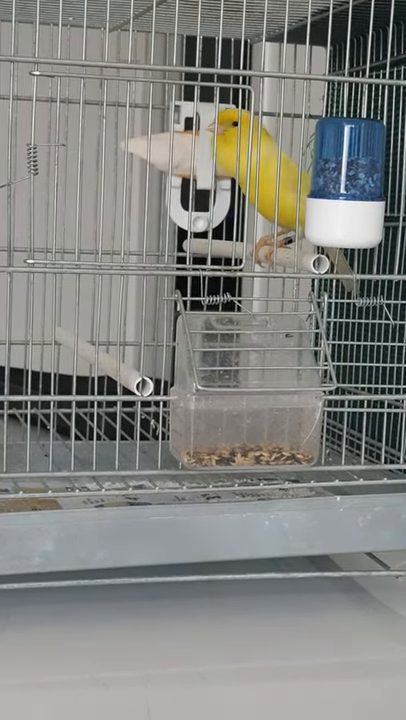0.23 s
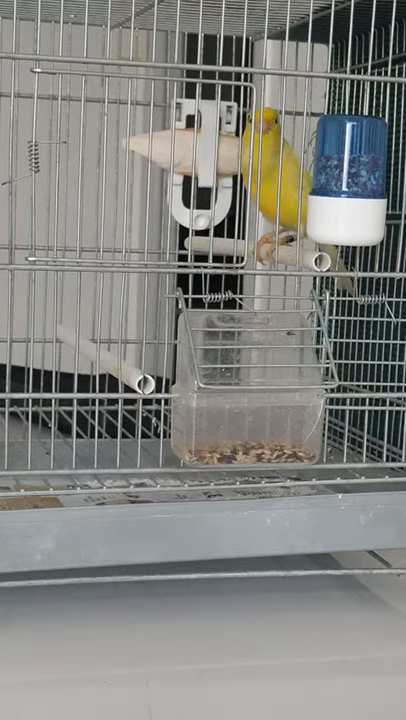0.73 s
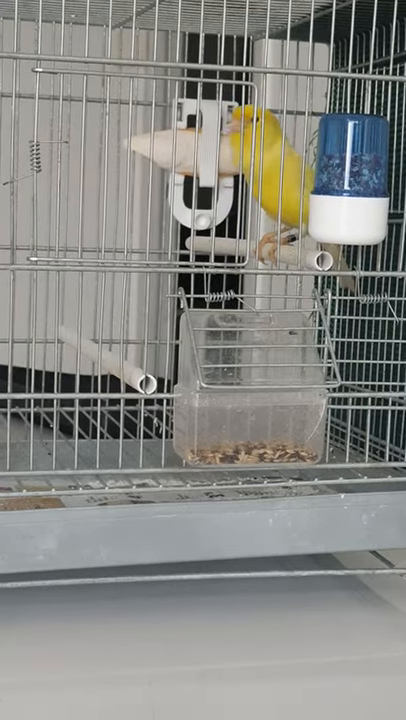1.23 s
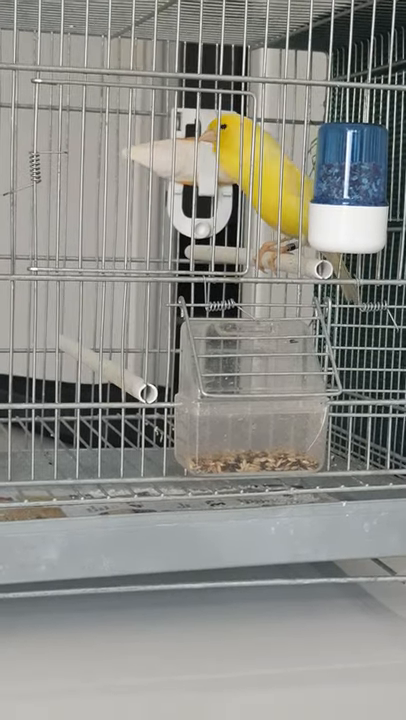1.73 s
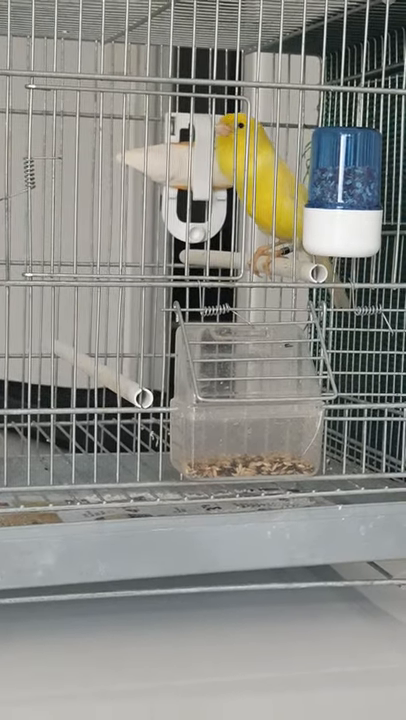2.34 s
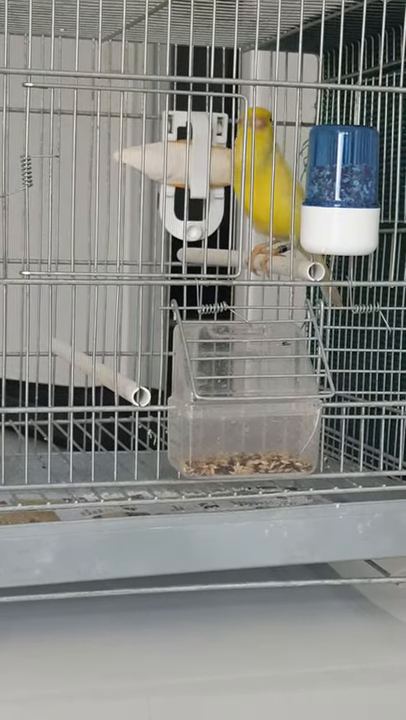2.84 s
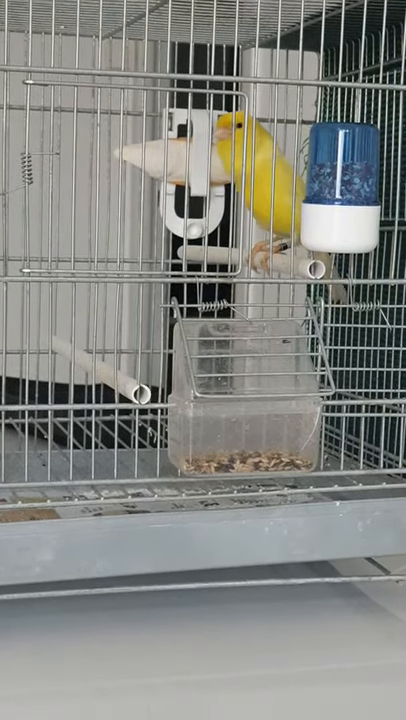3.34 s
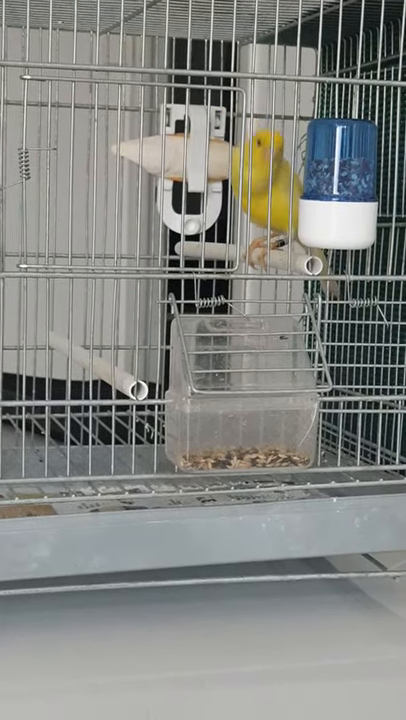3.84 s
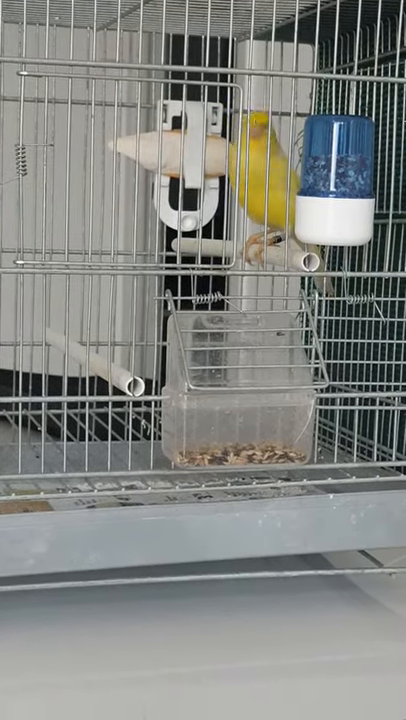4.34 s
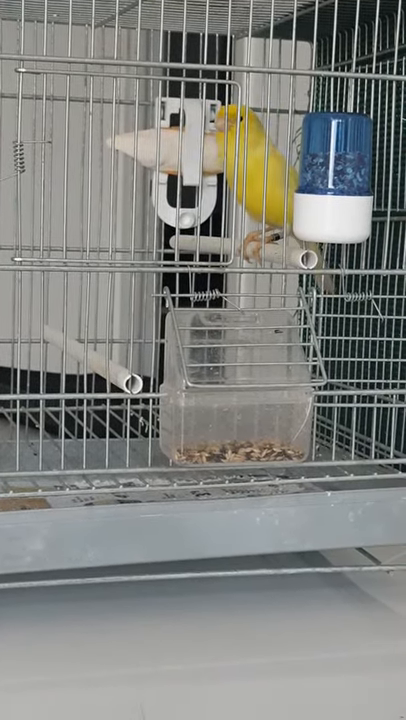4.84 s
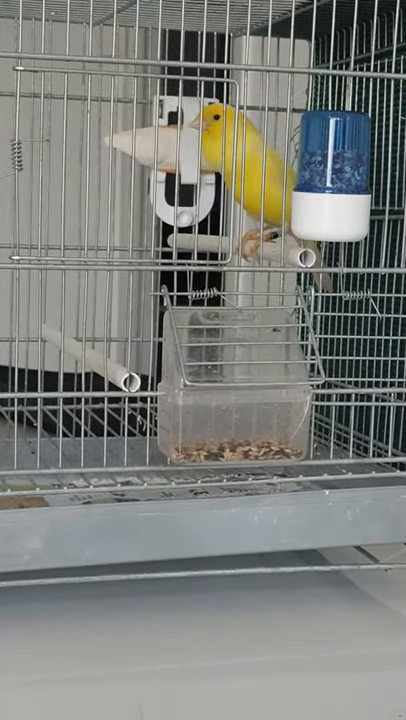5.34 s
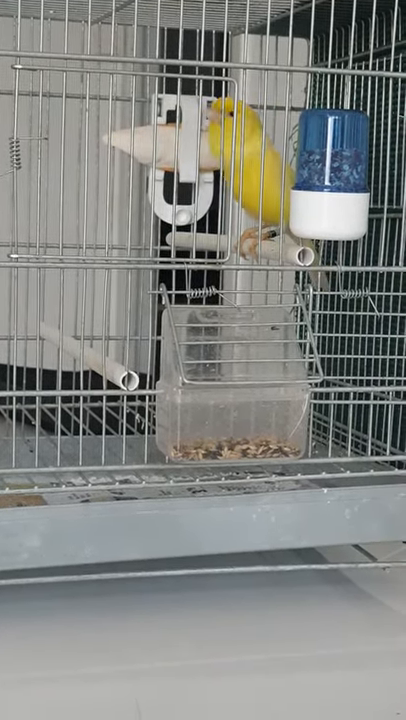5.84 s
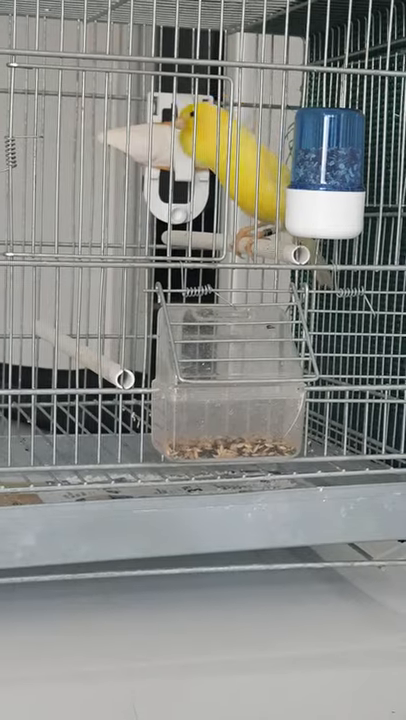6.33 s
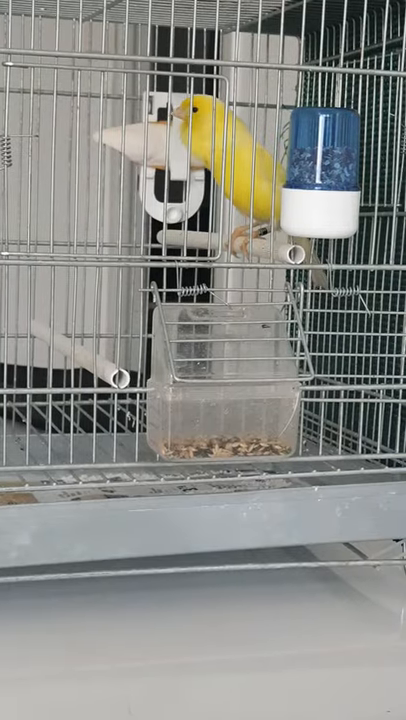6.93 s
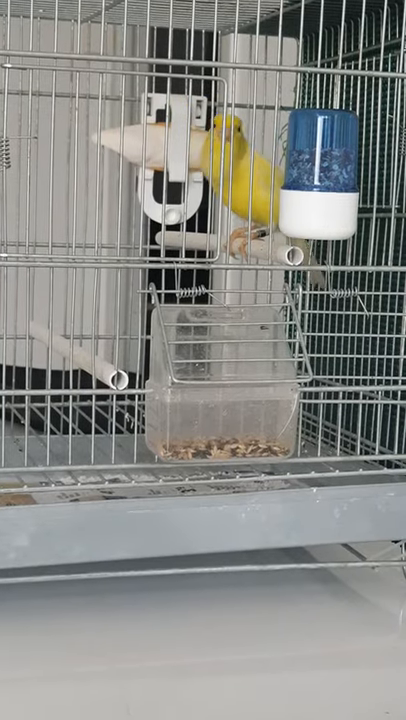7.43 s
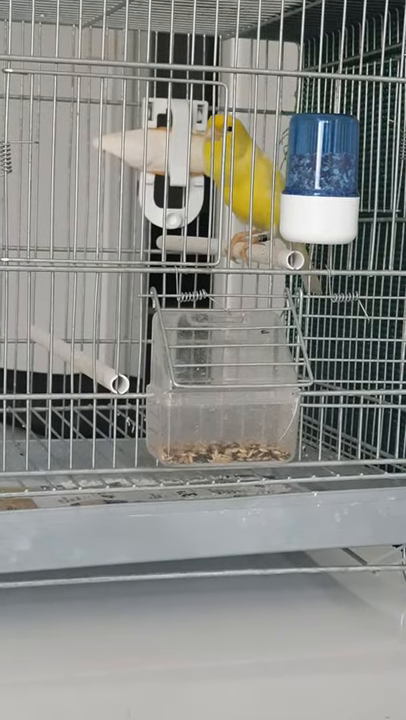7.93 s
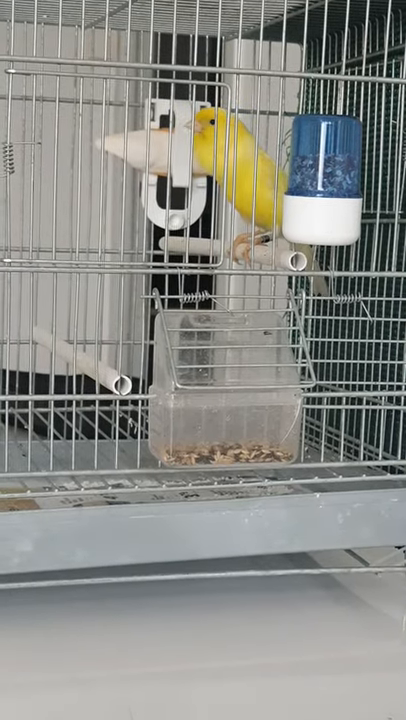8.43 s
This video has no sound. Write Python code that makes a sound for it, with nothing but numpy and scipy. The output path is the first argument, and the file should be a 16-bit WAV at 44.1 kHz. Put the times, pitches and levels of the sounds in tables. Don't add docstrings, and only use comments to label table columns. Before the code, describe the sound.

A caged canary sings in a bare echoing room: sharp chips, falling whistles, a hard quickening-loud roll, bubbling notes, then a fluted trill.

```python
import sys
import numpy as np
from scipy import signal
from scipy.fft import rfft, irfft
from scipy.io import wavfile
from scipy.ndimage import uniform_filter1d

SR = 44100
rng = np.random.default_rng(int(sys.argv[2]) if len(sys.argv) > 2 else 0)


def to_linear_factor(level_db):
    exponent = np.asarray(level_db, float) / 20
    return 10 ** exponent


def inscribe(sig):
    pcm = np.round(np.clip(np.atleast_2d(sig).T, -1, 1) * 32767)
    wavfile.write(sys.argv[1], SR, pcm.astype(np.int16))


N = 382788


def at_hz(points, hz):
    table_hz, value = np.transpose(points)
    return np.interp(np.log(hz + 1), np.log(table_hz), value)


def wander(hz):
    warm_up = 4410
    lowpass = signal.butter(2, hz, fs=SR, output="sos")
    slow = signal.sosfilt(lowpass, rng.standard_normal(N + warm_up))[warm_up:]
    return slow / slow.std()


# (frequency [Hz], level [dB])
THROAT = [(1200, 14.5), (2600, 7.5), (3300, -11), (4300, 3), (5600, -5.5), (6800, 3), (8200, -2),
          (10200, -1), (13500, -1.5), (15500, 5)]


def sing(syllables, shape, tone, air, own_pitch=False, purer=.18):
    out = np.zeros(N)
    when, ratio, shape_db = np.transpose(shape)
    flutter, breath = air
    for s, level_db, hz, length in syllables:
        knots = s + when * length
        first, last = max(round(knots[0] * SR), 0), min(round(knots[-1] * SR), N)
        i = np.arange(first, last)
        base_hz = 1 if own_pitch else hz
        pitch = np.interp(i / SR, knots, ratio) * base_hz * flutter[i]
        phase = 2 * np.pi * (np.cumsum(pitch) / SR + rng.random())
        push_db = np.interp(i / SR, knots, shape_db)
        wave = to_linear_factor(tone[0][1]) * np.sin(phase)
        for k, db in tone[1:]:
            colour = to_linear_factor(db + purer * push_db + at_hz(THROAT, k * pitch))
            colour *= k * pitch < SR / 2.2
            gusts = breath[(i + round(k * 9000)) % N]
            wave += colour * gusts * np.sin(k * phase)
        swell = to_linear_factor(level_db + push_db) * signal.windows.tukey(len(i), 90 / len(i))
        out[i] += uniform_filter1d(swell, size=45, mode="constant") * wave
    return out


def tour(marks, effort):
    s, level_db, hz = np.transpose(effort)
    spread_db, spread_pitch = .8, .007
    chance = rng.standard_normal((len(marks), 2)) * [spread_db, spread_pitch]
    rows = []
    for mark, (db, share) in zip(marks, chance):
        pitch = np.interp(mark, s, hz) * (1 + share)
        rows.append((mark, np.interp(mark, s, level_db) + db, pitch, 1))
    return rows


def low_side(notes, level_db, follows):
    mean_db = np.mean([row[1] for row in notes])
    return [(s, level_db + follows * (db - mean_db), hz, length) for s, db, hz, length in notes]


# (frequency
# [Hz], density [dB per Hz])
BACKGROUND_AIR = [(25, -48.5), (40, -12.5), (55, -2.5), (100, -9), (160, -18.5), (400, -23), (900, -28),
                  (1600, -7.5), (2050, -26.5), (2800, -20.5), (4500, -37), (8500, -40), (12000, -33), (15800, -37.5)]
# (frequency [Hz], likeness [0-1])
LIKENESS = [(30, .78), (70, .58), (150, .2), (600, .1), (3000, .1), (12000, .1)]
# (frequency [Hz], level [dB])
MAINS = (50.3, -77)


def background_air():
    t, hz = np.arange(N) / SR, np.fft.rfftfreq(N, 1 / SR)
    alike = np.clip(at_hz(LIKENESS, hz), 0, 1)
    mid, side = rfft(rng.standard_normal((2, N)))
    pair = np.sqrt(1 + alike) * mid + np.sqrt(1 - alike) * side * [[1], [-1]]
    air = irfft(to_linear_factor(at_hz(BACKGROUND_AIR, hz)) * pair, N)
    level_db, left_right_db = -66, 1
    mains_hz, mains_db = MAINS
    hum = to_linear_factor(mains_db + 3 * wander(3.6)) * np.sin(2 * np.pi * mains_hz * t)
    return to_linear_factor(level_db + left_right_db * np.array([[.5], [-.5]])) * air / air.std() + hum


# (time [s], peak level [dB], pitch [Hz], length factor)
OPENING = [
    (0.00086, -34, 1854, 0.84),
]
# (time from mark [s], pitch ratio, level [dB])
OPENING_NOTE = [(0, .975, -3), (.03, .955, -2), (.07, .985, -1), (.1, 1, 0), (.165, 1, -5),
                (.174, .99, -30)]
# (multiple of pitch, level [dB])
OPENING_TONE = [(1, -6.5), (2, -2.5), (3, -28), (4, -33), (6, -30.5)]


def opening(air):
    return sing(OPENING, OPENING_NOTE, OPENING_TONE, air)


# (time [s], peak level [dB], pitch [Hz], length factor)
EARLIER = [
    (0.0012, -38, 1699, 0.62),
]
# (time from mark [s], pitch ratio, level [dB])
EARLIER_NOTE = [(0, 1.26, 3.5), (.006, 0.97, 5.5), (0.015, 1.1, -7), (0.019, 0.69, -16.5)]
# (multiple of pitch, level [dB])
BUBBLE_TONE = [(1, 5.5), (2, -16), (3, -23), (4, -32.5), (5, -36.5)]


def earlier_phrase(air):
    return sing(EARLIER, EARLIER_NOTE, BUBBLE_TONE, air)


# (frequency [Hz], density [dB per Hz])
HISS = [(2500, -23), (3500, -0.5), (4400, 4.5), (5600, -8.5), (7000, 2), (8500, -21), (12000, -14.5),
        (14500, -7.5), (16000, -11.5)]
# (from time [s], level under the song [dB])
BREATHINESS = [
    (0, -48),
    (1.3, -50),
    (2.86, -27),
    (3.85, -33),
    (7.44, -59),
]


def hiss(song):
    colour = to_linear_factor(at_hz(HISS, np.fft.rfftfreq(N, 1 / SR)))
    noise = irfft(colour * rfft(rng.standard_normal(N)), N)
    start, db = np.transpose(BREATHINESS)
    phrase = np.clip(np.searchsorted(start, np.arange(N) / SR) - 1, 0, None)
    loudness = uniform_filter1d(np.abs(song), size=1500)
    return to_linear_factor(db[phrase]) * loudness * noise / noise.std()


# (time [s], peak level [dB], pitch [Hz], length factor)
CHIPS = [
    (.168, -12, 4400, 0.93),
    (.546, -12, 4535, 0.98),
]
# (time [s], peak level [dB], pitch [Hz], length factor)
LAST_CHIP = [
    (0.936, -15, 4697, 0.97),
]
# (time [s], peak level [dB], pitch [Hz], length factor)
CRACKS = [
    (.197, -61, 2200, 1),
    (.575, -43.5, 2290, 0.92),
    (.966, -41, 2340, 0.62),
]
# (time from mark [s], pitch ratio, level [dB])
TICK = [(-.0015, 1, -41), (.002, 0.73, -12.5), (.006, .96, -50)]
# (time from mark [s], pitch ratio, level [dB])
CHIP = [(.008, .93, -40), (.013, .99, -17), (.02, 1.004, -4), (.026, 1, 0), (.0315, .995, -1),
        (.0335, .92, -8), (.036, .84, -32)]
# (time from mark [s], pitch ratio, level [dB])
FALLING_CHIP = [(.008, 1.3, -33.5), (.013, 0.86, -18), (.02, 1.02, -5.5), (0.028, .99, 1), (.033, .9, -1.5),
                (.037, 0.86, -17.5)]
# (time from mark [s], pitch ratio, level [dB])
CRACK = [(-.007, 1.1, -21), (-.002, 1.05, 3), (.003, .96, -4), (.007, 0.9, -26.5)]
# (multiple of pitch, level [dB])
CHIP_TONE = [(1, 2.5), (2, -28.5), (3, -18), (3.5, -36)]
# (multiple of pitch, level [dB])
CRACK_TONE = [(1, 7.5), (3, -7), (3.5, -8.5), (5, 1.5), (7, -2.5)]


def chips(lively, calm):
    out = sing(CHIPS + LAST_CHIP, TICK, CHIP_TONE, lively)
    out += sing(CRACKS, CRACK, CRACK_TONE, lively)
    out += sing(CHIPS, CHIP, CHIP_TONE, calm)
    return out + sing(LAST_CHIP, FALLING_CHIP, CHIP_TONE, calm)


# (time [s], peak level [dB], pitch [Hz], length factor)
WHISTLES = [
    (.228, -55.5, 1434, 1.05),
    (.601, -62.5, 1416, 0.88),
    (.992, -59, 1453, 1.02),
]
# (time from mark [s], pitch ratio, level [dB])
WHISTLE = [(0, .985, -26), (.008, .995, -7), (0.141, 1.003, -5), (0.292, 1, -8), (.315, 0.98, -30)]
# (multiple of pitch, level [dB])
WHISTLE_TONE = [(1, 12.5), (2, 13), (4, -14), (5, -19.5)]


def whistles(calm):
    return sing(WHISTLES, WHISTLE, WHISTLE_TONE, calm) * to_linear_factor(2.5 * wander(25))


# (time [s], level [dB], half length [s])
THUDS = [
    (1.059, -64, 0.11),
    (5.247, -71, 0.093),
    (6.674, -63, 0.075),
]


def thuds():
    t, hz = np.arange(N) / SR, np.fft.rfftfreq(N, 1 / SR)
    noise = rfft(rng.standard_normal(N))
    low = irfft(noise / (1 + (hz / 110) ** 3) * (hz > 40), N)
    swell = sum(to_linear_factor(db) * np.exp(-((t - s) / half) ** 2) for s, db, half in THUDS)
    return low * swell / low.std()


# (time [s], peak level [dB])
TAPS = [
    (1.165, -51),
    (1.884, -37.5),
    (1.906, -82.5),
]


def taps():
    clicks = np.full(N, 1e-18)
    for s, db in TAPS:
        clicks[round(s * SR)] = to_linear_factor(db)
    body = signal.butter(2, [60, 1300], "band", fs=SR, output="sos")
    thump = signal.sosfilt(body, to_linear_factor(23.0) * clicks)
    rattle_db, rattle_s = -24, 0.016
    fading = signal.lfilter([1], [1, -np.exp(-1 / (rattle_s * SR))], clicks)
    return thump + to_linear_factor(rattle_db) * fading * np.diff(rng.standard_normal(N + 1))


# (time [s], peak level [dB], pitch [Hz], length factor)
GLIDES = [
    (1.335, -25, 2488, 1.206),
    (1.837, -23.5, 2537, 1.01),
    (2.34, -25, 2517, 1),
]
# (time from mark [s], pitch ratio, level [dB])
GLIDE = [(0, 1.22, -35.5), (.019, 1.125, -22), (.036, 1.07, -15.5), (.07, 1.02, -5.5), (.095, .975, -5),
         (.12, .91, 2), (.15, .83, -4), (.153, 0.767, -17), (0.159, 0.6, -28.5)]
# (multiple of pitch, level [dB])
GLIDE_TONE = [(1, 7.5), (2, -29), (3, -31.5), (4, -37.5), (5, -31.5), (6, -44.5), (7, -38.5)]


def glides(held):
    return sing(GLIDES, GLIDE, GLIDE_TONE, held, purer=-0.19)


# (time [s], peak level [dB], pitch [Hz], length factor)
ARCHES = [
    (1.562, -37.5, 986.6, 0.92),
    (2.038, -37.5, 959.4, 0.96),
    (2.528, -39, 948.3, 1.05),
]
# (time from mark [s], pitch ratio, level [dB])
ARCH = [(0, 2.1, 0), (.008, 0.82, -19), (0.02, .74, -17), (0.036, .93, -8), (0.059, .99, -7),
        (0.165, .99, -4.5), (.198, .92, -5), (0.218, 0.83, -14), (0.226, 0.53, -45)]
# (multiple of pitch, level [dB])
ARCH_TONE = [(1, 2.5), (2, -7), (3, -5), (4, -19.5), (5, -20.5), (6, -27), (7, -23)]


def arches(ragged):
    return sing(ARCHES, ARCH, ARCH_TONE, ragged)


# (time [s], peak level [dB], pitch [Hz])
ROLL_EFFORT = [(2.89, -64, 2152), (2.925, -38, 2205), (3.0, -27.5, 2229), (3.115, -24.5, 2244),
               (3.36, -19, 2317), (3.6, -18.5, 2356), (3.721, -18.5, 2388)]
# (time [s], peak level [dB], pitch [Hz])
ROLL_UNDER = [(2.89, -46.5, 1840), (2.924, -35, 1750), (3.0, -36, 1680), (3.08, -37, 1760),
              (3.15, -44, 1780)]
# (time from mark [s], pitch ratio, level [dB])
ROLL_PIP = [(-.0026, 1.06, -24), (-.0007, 1.02, 0), (.0007, .99, 0), (.0026, .94, -24)]
# (time from mark [s], pitch [Hz], level [dB])
ROLL_LOW = [(.018, 800, -22), (0.022, 850, -1.5), (0.026, 910, -3), (0.0275, 1100, -10), (0.0305, 1550, -9),
            (0.033, 1850, -24)]
# (multiple of pitch, level [dB])
PIP_TONE = [(1, -1), (2, -43), (3, -42), (6, -43.5)]
# (multiple of pitch, level [dB])
ROLL_LOW_TONE = [(1, 1.5), (2, -5), (3, -13)]


def hard_roll(lively):
    start_s, gap_s, slows_s = 2.8867, .03722, .000244
    beat = np.arange(22)
    pips = tour(start_s + gap_s * beat + slows_s * beat ** 2 / 2, ROLL_EFFORT)
    late_last = (*pips[-1][:3], 1.5)
    followed = [(2.845, -62.5, 1700, 0.9)] + pips[:-1] + [late_last]
    low = low_side(followed, level_db=-42.5, follows=0.2)
    under = tour([row[0] for row in pips[:7]], ROLL_UNDER)
    out = sing(pips, ROLL_PIP, PIP_TONE, lively)
    out += sing(low, ROLL_LOW, ROLL_LOW_TONE, lively, own_pitch=True)
    return out + sing(under, ROLL_PIP, PIP_TONE[:1], lively)


# (from time [s], to time [s], frequency [Hz], level [dB])
FAR_DRONES = [
    (3.737, 4.251, 479, -84),
    (7.466, 8.203, 490, -79),
]


def far_drones():
    t, out = np.arange(N) / SR, np.zeros(N)
    for start, end, drone_hz, db in FAR_DRONES:
        on = np.clip(np.minimum(t - start, end - t) / 0.037, 0, 1)
        out += to_linear_factor(db) * on * wander(23) * np.sin(2 * np.pi * drone_hz * t)
    return out


# (time [s], peak level [dB], pitch [Hz])
DROPS = [(3.949, -31, 1664), (4.083, -31, 1620), (4.518, -36.5, 1651), (4.65, -35.5, 1630),
         (4.799, -41, 1653), (4.947, -31.5, 1647), (5.09, -33.5, 1628), (5.186, -33, 1657),
         (5.274, -35.5, 1727), (5.354, -36, 1801), (5.437, -35.5, 1780), (5.522, -37.5, 1810),
         (5.608, -38, 1735), (5.694, -35.5, 1793), (5.786, -37.5, 1807), (5.874, -34.5, 1725),
         (5.963, -37, 1710), (6.056, -36, 1742), (6.152, -36.5, 1792)]
# (time from mark [s], pitch ratio, level [dB])
DROP_HIGH = [(-.04, .99, -24), (-.03, .985, -11), (-.02, .995, -4), (-.006, 1.015, 0), (-.001, 1.02, -2),
             (.002, .85, -22)]
# (time from mark [s], pitch [Hz], level [dB])
DROP_LOW = [(-.001, 1133, -5), (.003, 800, 5.5), (0.01, 688, -6), (0.023, 619, -26), (0.037, 566, -11.5)]
# (time from mark [s], pitch [Hz], level [dB])
DROP_BUZZ = [(.01, 728, -9.5), (0.02, 655.5, -11.5), (0.043, 600, -17.5), (.062, 613, -14)]
# (multiple of pitch, level [dB])
HIGH_TONE = [(1, -4), (2, -16), (3, -38.5), (4, -47)]
# (multiple of pitch, level [dB])
DROP_LOW_TONE = [(1, 0), (2, -13), (3, -16)]
# (multiple of pitch, level [dB])
BUZZ_TONE = [(1, 2), (1.5, -8.5), (2, -3.5), (3, -7.5), (4, -13)]


def water_drops(lively, held):
    quicken_s, quick_length = 5.14, .82
    high = [(*row, 1 if row[0] < quicken_s else quick_length) for row in DROPS]
    low = low_side(high, level_db=-51, follows=0.2)
    out = sing(high, DROP_HIGH, HIGH_TONE, held)
    out += sing(low, DROP_LOW, DROP_LOW_TONE, lively, own_pitch=True)
    return out + sing(low, DROP_BUZZ, BUZZ_TONE, lively, own_pitch=True)


# (time [s], peak level [dB], pitch [Hz])
BUBBLES = [(6.225, -48, 1366), (6.296, -44, 1380), (6.375, -41, 1405), (6.449, -42, 1413),
           (6.536, -40, 1350), (6.618, -40, 1342), (6.698, -41, 1431), (6.781, -36.5, 1378),
           (6.859, -37.5, 1371), (6.947, -40.5, 1391), (7.021, -40.5, 1243), (7.102, -39.5, 1287),
           (7.179, -41, 1475), (7.265, -40.5, 1463), (7.354, -39, 1526)]
# (time from mark [s], pitch [Hz], level [dB])
BUBBLE_LOW = [(-.004, 722, -19.5), (.004, 782, -4), (0.013, 785, -8), (0.02, 837, -3.5), (.023, 983, -2.5),
              (0.027, 1268, -18.5)]
# (time from mark [s], pitch ratio, level [dB])
BUBBLE_HIGH = [(.024, .8, -18), (.029, .98, -6), (.035, 1.015, 0), (.042, 1, -4), (.052, .96, -11),
               (.064, .91, -20)]
# (multiple of pitch, level [dB])
BUBBLE_LOW_TONE = [(1, -1), (2, -12), (3, -13)]


def bubbles(lively):
    high = [(*row, 1) for row in BUBBLES]
    low = low_side(high, level_db=-41, follows=0.31)
    rasp = to_linear_factor(3 * wander(150))
    out = sing(high, BUBBLE_HIGH, BUBBLE_TONE, lively) * rasp
    return out + sing(low, BUBBLE_LOW, BUBBLE_LOW_TONE, lively, own_pitch=True)


# (time [s], peak level [dB], pitch [Hz], length factor)
SCOOP = [
    (7.435, -35, 1890, 1.15),
]
# (time from mark [s], pitch ratio, level [dB])
SCOOP_NOTE = [(-.03, .8, -16), (-.01, .83, -8), (.008, .86, -5), (.02, .95, -1), (.034, 1, -3),
              (.042, 1, -20)]
FLUTES = [7.489, 7.555, 7.617, 7.686, 7.759, 7.824, 7.888, 7.963, 8.028, 8.101, 8.171, 8.244, 8.325, 8.422,
          8.521, 8.622, 8.718]
# (time [s], peak level [dB], pitch [Hz])
FLUTE_EFFORT = [(7.488, -27, 1923), (7.561, -27, 1920), (7.9, -26.5, 1935), (8.201, -27.5, 1924),
                (8.399, -22.5, 1878), (8.68, -23.5, 1870)]
# (time from mark [s], pitch ratio, level [dB])
FLUTE = [(-.068, .975, -16), (-.055, .988, -8), (-.028, 1, -4), (-.006, 1.006, 0), (-.001, .995, -3),
         (.003, .95, -28)]
# (multiple of pitch, level [dB])
FLUTE_TONE = [(1, -5.5), (2, -24.5), (3, -30), (4, -43), (5, -53), (6, -48), (8, -51)]
# (time from mark [s], pitch ratio, level [dB])
FLUTE_CATCH = [(-.002, 1.05, -21), (.001, .97, 10.5), (.004, .84, -10), (.007, 0.53, -23)]
# (time [s], peak level [dB], pitch [Hz])
CATCH_EFFORT = [(7.49, -37.5, 1928), (8.05, -36, 1944), (8.3, -39, 1940)]


def fluted_trill(held, calm):
    breaths = np.diff([7.462] + FLUTES)
    notes = tour(FLUTES, FLUTE_EFFORT)
    notes = [(*row[:3], gap / 0.1) for row, gap in zip(notes, breaths)]
    out = sing(SCOOP, SCOOP_NOTE, FLUTE_TONE, calm)
    out += sing(notes, FLUTE, FLUTE_TONE, held)
    return out + sing(tour(FLUTES[:-1], CATCH_EFFORT), FLUTE_CATCH, FLUTE_TONE[:1], calm)


def canary():
    flutter = 1 + 0.0073 * wander(66) + 0.00065 * wander(350)
    steady = 1 + .003 * wander(60)
    gusty = 0.78 + 0.55 * wander(120)
    smooth = 1.226 + 0.075 * wander(35)
    uneven = 0.33 + .5 * wander(79)
    lively, held, calm = (flutter, gusty), (steady, gusty), (steady, smooth)
    song = opening((steady, uneven)) + chips(lively, calm) + whistles(calm)
    song += glides(held) + arches((flutter, uneven))
    song += hard_roll(lively) + water_drops(lively, held)
    song += bubbles(lively) + fluted_trill(held, calm)
    unsteady = to_linear_factor(1.3 * wander(40))
    return song * unsteady, earlier_phrase(lively)


RIGHT_LAG = 7
# (time [s], left-right level [dB])
FACING = [(0.0, 2), (0.85, 1), (1.179, 5), (2.2, 0), (2.319, 7), (2.659, -4.5), (3.192, 4.5), (3.892, 4.5),
          (4.2, 2), (5, -1), (5.599, -5.5), (6.201, 0), (7.08, 0.5), (8.12, 1.5), (8.68, -1.5)]
# (frequency [Hz], left-right level [dB])
PORT_TILT = [(300, -2.5), (1500, -5.5), (4500, 8.5), (9000, -20.5), (15000, -9)]


def ports(x):
    pan_db = np.interp(np.arange(N) / SR, *np.transpose(FACING))
    hz = np.fft.rfftfreq(N, 1 / SR)
    pair = np.array([x * to_linear_factor(pan_db / 2), np.roll(x, RIGHT_LAG) * to_linear_factor(-pan_db / 2)])
    return irfft(rfft(pair) * to_linear_factor(np.outer([.5, -.5], at_hz(PORT_TILT, hz))), N)


# (time [s], level [dB])
WALLS = [
    (.0064, -11.5),
    (0.012, -15),
    (0.0245, -14),
]
# (frequency [Hz], time [s])
ROOM_T60 = [(500, 0.72), (1500, 0.44), (3000, 0.37), (5000, 0.48), (12000, 0.29)]
# (frequency [Hz], level [dB])
ROOM_COLOUR = [(200, -18.5), (420, -11), (850, -9), (1450, -5.5), (1700, -7), (2000, -2.5), (2600, -2),
               (4200, .5), (13600, 1)]


def room(x):
    t = np.arange(SR) / SR
    tail, edges = np.zeros((2, SR)), 150 * 2. ** np.arange(0, 7.1, .5)
    white = rng.standard_normal((2, SR))
    for low, high in zip(edges, edges[1:]):
        band = signal.sosfilt(signal.butter(2, [low, high], "band", fs=SR, output="sos"), white)
        hz = np.sqrt(low * high)
        tail += band * to_linear_factor(at_hz(ROOM_COLOUR, hz) - 60 * t / at_hz(ROOM_T60, hz))
    tail *= 1 - np.exp(-(t / 0.013) ** 2)
    tail *= to_linear_factor(2) / np.sqrt(np.sum(tail ** 2, axis=1, keepdims=True))
    echoes = np.zeros((2, SR))
    for s, db in WALLS:
        echoes[[0, 1], round(s * SR) + np.array([0, RIGHT_LAG])] += to_linear_factor(db)
    wall_cut = signal.butter(2, 1300, "high", fs=SR)
    tail += signal.lfilter(*wall_cut, echoes + 1e-18)
    return signal.fftconvolve(x[None], tail, axes=1)[:, :N]


def scene():
    song, earlier = canary()
    cage = to_linear_factor(-3.5) * (song + hiss(song)) + taps()
    background = background_air() + thuds() + far_drones()
    return ports(cage) + room(cage + earlier) + background


def roll_off(x):
    return signal.sosfilt(signal.butter(12, 15950, fs=SR, output="sos"), x)


def record(dry):
    return roll_off(dry)


dry = scene()
out = record(dry)
inscribe(out)
```